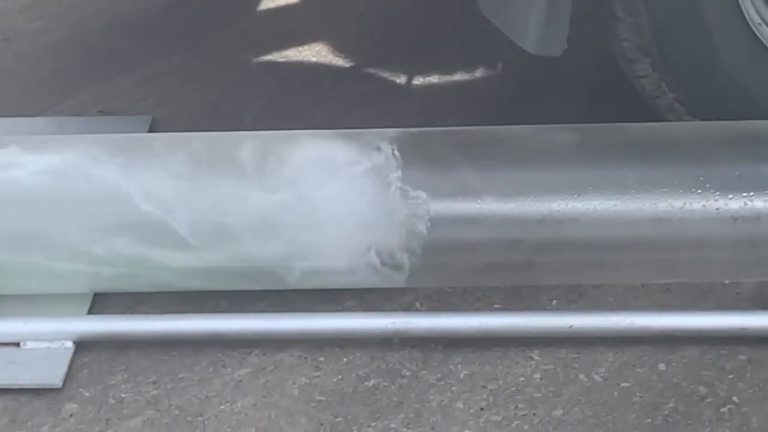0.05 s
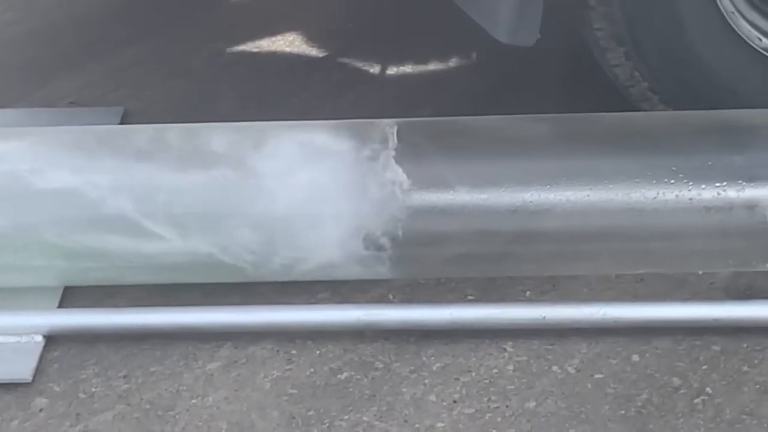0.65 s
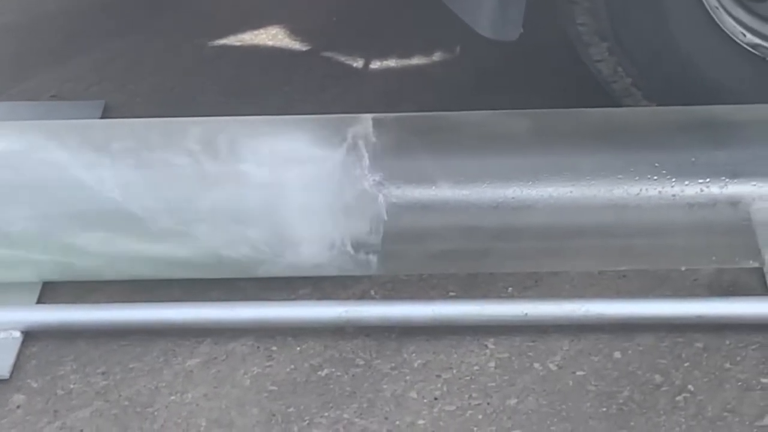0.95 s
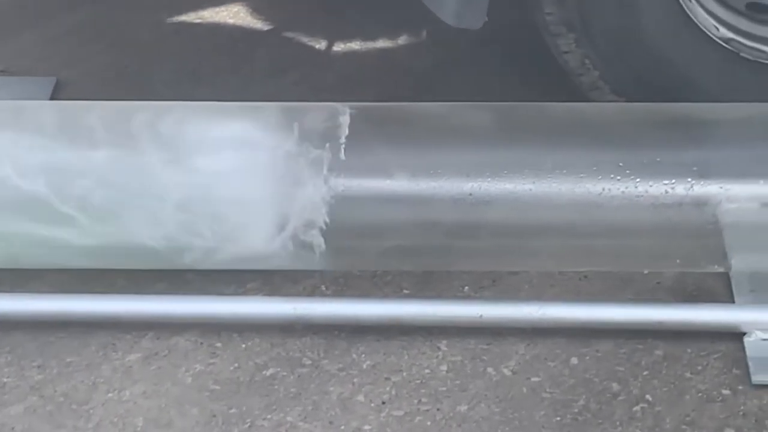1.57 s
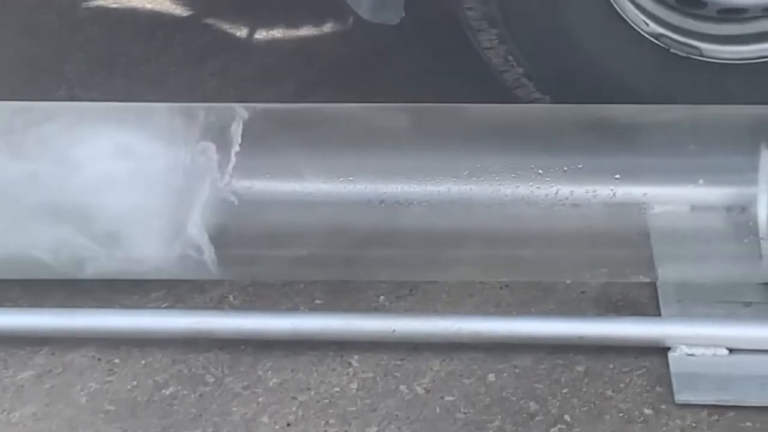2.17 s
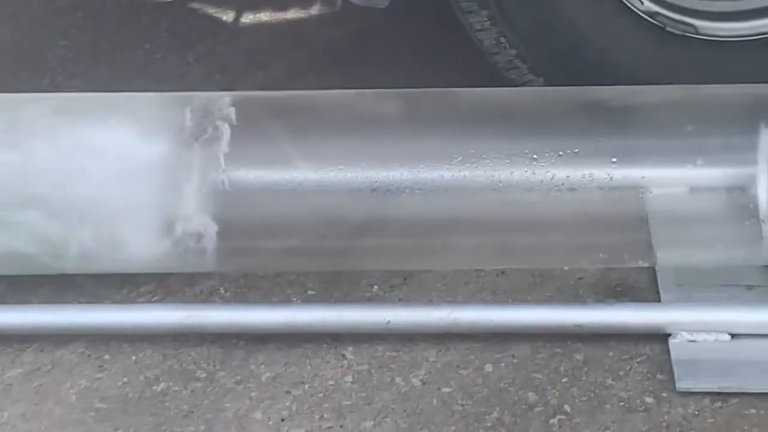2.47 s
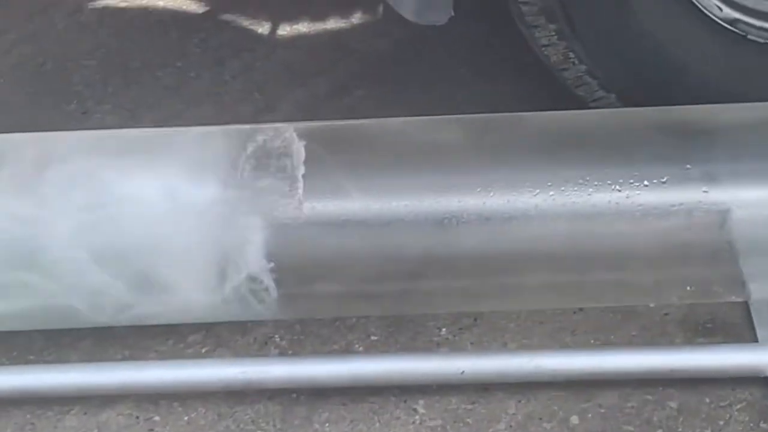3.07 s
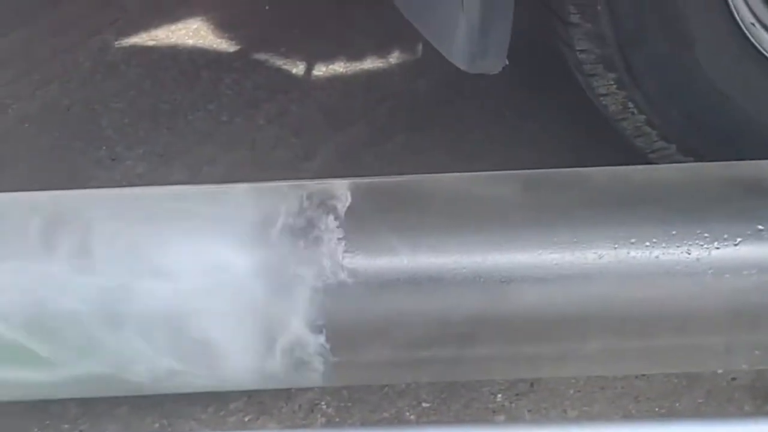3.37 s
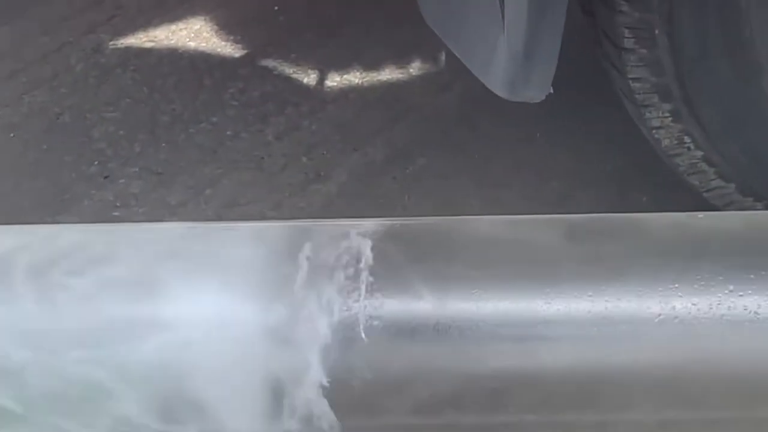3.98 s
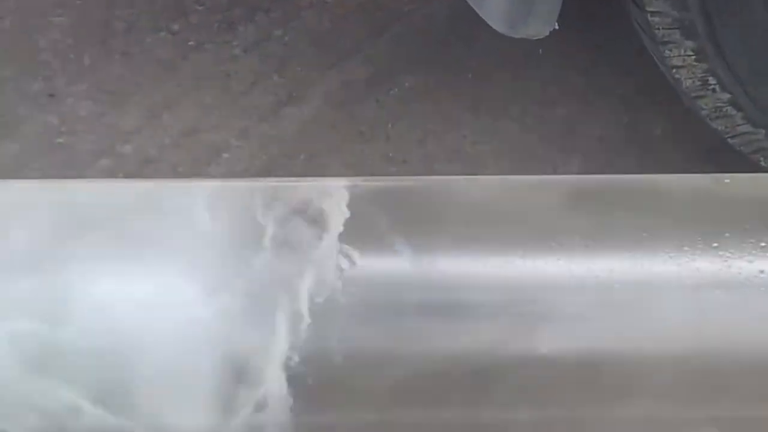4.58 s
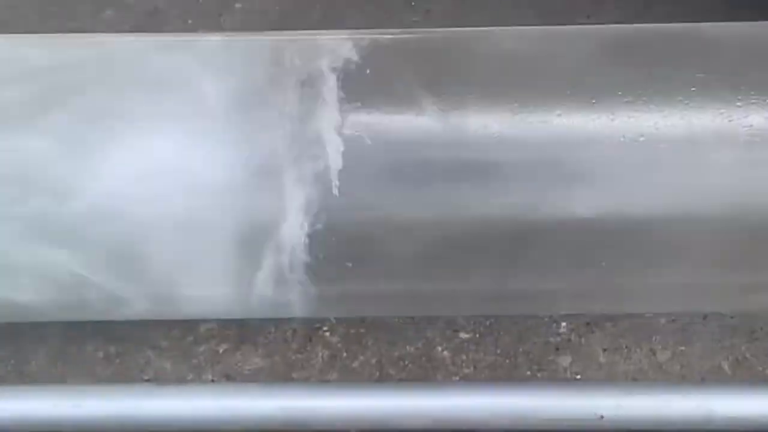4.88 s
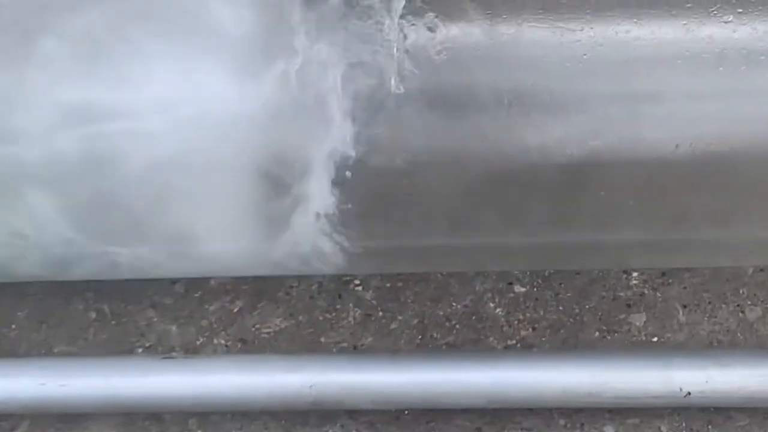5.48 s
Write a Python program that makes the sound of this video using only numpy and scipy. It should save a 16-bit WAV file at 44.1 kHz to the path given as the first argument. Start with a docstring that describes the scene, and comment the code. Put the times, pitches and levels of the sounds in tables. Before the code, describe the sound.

A jet of water churns inside a plastic tube with a continuous rushing hiss. Over it, the impeller driving the jet spins up in a whistling whine that climbs about an octave, quickly at first and then more slowly, fluttering as its overtones swell and dip. The rush eases slightly past the middle. A nearby engine hums low and steady underneath. It is heard outdoors, close up, in stereo on a handheld phone.

```python
"""Water jet into a plastic tube

Outdoors, in stereo on a handheld phone. A ten-bladed impeller spins up and drives a jet into a
clear plastic tube: its blade tones rise as a whistle over a chord of shaft orders, while the
water churns and hisses in the tube. Nearby an engine hums at a steady speed."""
import sys
import numpy as np
from scipy import signal
from scipy.fft import rfft, irfft
from scipy.io import wavfile
from scipy.ndimage import uniform_filter1d

SR = 44100
rng = np.random.default_rng(int(sys.argv[2]) if len(sys.argv) > 2 else 0)


def file_out(sig):
    """Save sig as 16-bit WAV at sys.argv[1]."""
    # one column per channel
    cols = np.atleast_2d(sig).T
    # limit, then scale
    lim = np.clip(cols, -1, 1)
    pcm = np.round(lim * 32767).astype(np.int16)
    wavfile.write(sys.argv[1], SR, pcm)


N = 253134
BLADES, REFERENCE_SHAFT_HZ = 10, 310
FADE_RATE_HZ, FADE_DEPTH = 45, .21  # foam fades the blade tones in and out
HOLLOW_HZ, TOP_HZ = 836, 15650  # centre of the dip in the rush; the phone's upper limit

# impeller speed, levelling off as it spins up: (time [s], shaft rate [Hz])
SHAFT_SPEED = [(0.0, 176.2), (0.3, 200.7), (0.6, 223.2), (0.95, 245.6), (1.3, 266.4), (1.65, 283.8),
               (2.1, 303.8), (2.5, 319.2), (2.9, 331.7), (3.35, 343.0), (3.9, 354.0), (4.5, 363.7),
               (5.1, 372.7), (5.74, 381.5)]
# blade tone and overtones: (multiple of the blade rate, level off resonance [dB])
BLADE_HARMONICS = [(1, -34.5), (2, -19.8), (3, -32), (4, -36), (5, -38), (6, -41), (7, -42), (8, -47)]
# peaks and nodes in the tube, for each main order: (shaft order, frequency [Hz], width [Hz], gain [dB])
TUBE_STANDING_WAVES = [(2, 514, 17, 7), (2, 599, 17, -16), (3, 614, 33, -17), (3, 664, 17, -19),
                       (3, 729, 24, 4), (3, 988, 10, 6), (3, 1068, 50, -15), (3, 1115, 16, -5),
                       (4, 1041, 28, -20), (4, 1154, 18, -15), (4, 1355, 140, -20), (4, 1430, 240, 10),
                       (5, 1040, 60, -8), (5, 1205, 25, 5), (5, 1252, 35, -13), (5, 1310, 50, 5),
                       (5, 1403, 146, -9), (5, 1898, 223, -14), (6, 1200, 45, 11), (6, 1725, 43, 10),
                       (6, 1870, 15, 8), (6, 2130, 120, -5), (6, 2224, 92, -8), (6, 2262, 57, 16),
                       (7, 1399, 165, -4), (7, 1908, 40, 4), (7, 1992, 204, 6), (7, 2118, 24, -12),
                       (7, 2314, 40, 8), (7, 2460, 36, 7), (7, 2520, 70, 4), (7, 2580, 118, -7),
                       (9, 2690, 90, 6), (9, 3130, 484, -6), (9, 3407, 43, -9), (10, 1806, 24, -13),
                       (10, 1917, 149, 16), (10, 2000, 35, 9), (10, 2115, 49, -20), (10, 2157, 69, 11),
                       (10, 2200, 14, -8), (10, 2250, 28, -6), (10, 2290, 18, -7), (10, 2335, 20, 5),
                       (10, 2403, 52, -20), (10, 2439, 119, 11), (10, 2490, 24, 3), (10, 2535, 18, -6),
                       (10, 2596, 30, 6), (10, 2631, 31, -7), (10, 2670, 18, -6), (10, 2723, 16, 7),
                       (10, 2742, 8, -13), (10, 2783, 64, 8), (10, 2804, 10, -20), (10, 2843, 19, -13),
                       (10, 2854, 40, 11), (10, 2986, 30, -14), (10, 3044, 11, 5), (10, 3149, 96, 12),
                       (10, 3162, 27, -13), (10, 3212, 11, -5), (10, 3246, 8, -12), (10, 3280, 10, -6),
                       (10, 3310, 24, -20), (10, 3336, 322, 16), (10, 3355, 16, -7), (10, 3397, 17, -12),
                       (10, 3445, 18, 4), (10, 3493, 15, -15), (10, 3532, 16, -14), (10, 3564, 10, 4),
                       (10, 3598, 14, -10), (10, 3615, 7, -9), (10, 3624, 12, 16), (10, 3629, 24, -12),
                       (10, 3677, 20, 10), (10, 3691, 10, -16), (10, 3711, 7, 7), (10, 3720, 6, -14),
                       (10, 3741, 7, 7), (10, 3772, 52, 16), (10, 3783, 14, -15), (11, 3241, 186, 10),
                       (11, 3878, 54, -10), (11, 4123, 44, 9), (13, 3954, 49, 9), (13, 4370, 505, -9),
                       (14, 3930, 54, 8), (14, 4616, 52, -15), (14, 4995, 136, 9), (15, 4528, 113, 9),
                       (15, 5327, 44, -20), (16, 4531, 116, 10), (16, 5049, 24, 9), (16, 5523, 70, -12),
                       (17, 5022, 83, 12), (17, 6160, 124, -11), (17, 6384, 31, 7), (19, 4554, 1112, 9),
                       (19, 6925, 101, 8), (20, 3592, 144, -20), (20, 3775, 65, -16), (20, 4071, 120, 6),
                       (20, 4240, 131, -20), (20, 4379, 48, -13), (20, 4628, 127, -10), (20, 4771, 32, -10),
                       (20, 4880, 50, 3), (20, 4970, 60, -20), (20, 5000, 42, 12), (20, 5096, 60, -20),
                       (20, 5255, 49, -14), (20, 5411, 54, -14), (20, 5515, 178, 10), (20, 5699, 355, -20),
                       (20, 5717, 19, 12), (20, 6018, 173, 6), (20, 6075, 20, -6), (20, 6158, 43, -19),
                       (20, 6274, 24, -16), (20, 6477, 313, -10), (20, 6638, 11, -13), (20, 6906, 10, -14),
                       (20, 6932, 34, 10), (20, 6960, 14, -6), (20, 7002, 15, 7), (20, 7168, 96, 15),
                       (20, 7175, 51, -20), (20, 7279, 63, -8), (20, 7374, 1200, -9), (20, 7404, 14, -14),
                       (20, 7465, 10, -9), (20, 7509, 46, 8), (30, 6211, 252, 7), (30, 8123, 131, 5),
                       (30, 8688, 210, 6), (30, 9599, 63, 11), (30, 9890, 346, -12), (30, 10107, 370, 14),
                       (30, 10935, 1657, -9), (30, 11073, 381, 12), (40, 8680, 265, 13),
                       (40, 11915, 191, 5), (40, 14279, 321, -6)]
# other multiples of the shaft rate: (shaft order, level off resonance at the reference speed [dB])
SHAFT_HARMONICS = [(1, -56), (2, -50.0), (3, -40.5), (4, -45.5), (5, -41.5), (6, -48.5), (7, -46.5),
                   (8, -47.0), (9, -41.0), (11, -41.0), (12, -42.0), (13, -38.0), (14, -41.5), (15, -40.5),
                   (16, -39.0), (17, -40.5), (18, -42.0), (19, -44.0), (21, -43.0), (22, -45.5),
                   (23, -44.5), (24, -45.5), (25, -46.0), (26, -42.0), (27, -48.0), (28, -49.5),
                   (29, -49.5), (31, -53.5), (32, -53.0), (33, -55.0), (34, -52.5), (35, -54.0),
                   (36, -47.0), (37, -54.0), (38, -56.0), (39, -53.0), (41, -58.0), (42, -55.5),
                   (46, -51.0)]
# housing resonances that lift a passing shaft tone: (frequency [Hz], width [Hz], gain [dB])
HOUSING_MODES = [(219, 60, 11), (254, 26, 13), (305, 50, 11), (377, 14, 3), (648, 110, 11), (763, 31, 7.5),
                 (1320, 113, 9.5), (1897, 207, 10.5)]
# strength of the flow: (time [s], level [dB])
FLOW_LEVEL = [(0, 5.5), (.5, 2), (2.15, 2), (3.0, -1.4), (3.7, -3.5), (4.3, -2.5), (5.74, -1.3)]
# rushing water at a flow level of 0 dB: (frequency [Hz], noise density [dB re 1/Hz])
WATER_SPECTRUM = [(25, -90), (60, -71.5), (150, -73.5), (400, -70), (680, -70.5), (930, -75), (1300, -75),
                  (2400, -75.5), (3300, -72), (4500, -72), (6500, -70.5), (9000, -74), (11000, -77),
                  (13000, -78.5), (15000, -87)]
# how closely the rush follows the flow: (frequency [Hz], slope [dB per dB])
FLOW_SENSITIVITY = [(344, 1.0), (1380, 1), (6900, 1.2)]
# one band of the rush hollows out as the phone moves in: (time [s], gain at the dip's centre [dB])
HOLLOW_GAIN = [(0, -0.5), (2.8, 1), (3.7, -10), (5.1, -36), (5.74, -15)]
# hollow resonances of the tube: (frequency [Hz], width [Hz], level at a flow of 0 dB [dB])
TUBE_MODES = [(213.7, 44, -45.5), (297.5, 25.3, -45), (523.2, 20.4, -48.5)]
# engine lines, drifting in level as the phone moves: (frequency [Hz], start level [dB], end level [dB])
ENGINE_LINES = [(56, -59, -62), (69.3, -41.5, -49), (166.6, -42, -64.5), (174.8, -56, -68.5),
                (241.7, -45, -66.5), (396, -54, -72), (411, -80, -55)]
# water noise coming back from all around: (frequency [Hz], gain on the water spectrum [dB])
SCATTER = [(40, -13), (70, -10), (110, -16), (500, -3.5), (1300, -2.5), (2400, -1.0), (3600, -45),
           (12000, -64)]
# stereo phase by frequency: (frequency [Hz], lead of left over right [rad])
STEREO_PHASE = [(0, 0), (1300, -.6), (1800, .3), (2150, .7), (2450, 2.3), (3100, 1.05), (3900, 2.05),
                (4300, 2.8), (4950, 3.45), (6400, 6.1), (7200, 6.45), (8400, 9.2), (9400, 9.6),
                (10700, 12.4), (11500, 12.75), (12700, 15.5), (13700, 15.9), (15000, 18.7)]
# stereo balance by frequency: (frequency [Hz], left minus right [dB])
STEREO_BALANCE = [(200, 0), (500, -.5), (1400, 0), (2100, -4), (2700, -1), (3600, 0)]


def undb(db):
    """Decibels to gain."""
    return 10 ** (np.asarray(db) / 20)


def curve(table):
    """Join (time, value) points by straight lines at every sample."""
    return np.interp(np.arange(N) / SR, *np.transpose(table))


def colour(table, hz):
    """Read (frequency, value) points on a log-frequency axis."""
    points_hz, values = np.transpose(table)
    return np.interp(np.log(np.maximum(hz, 1)), np.log(points_hz), values)


def walk(rate_hz):
    """Random levels held for 1 / rate_hz seconds and smoothed twice; spread 1."""
    hold = max(int(SR / rate_hz), 2)
    held = np.repeat(rng.standard_normal(N // hold + 2), hold)[rng.integers(hold):]
    return uniform_filter1d(uniform_filter1d(held, hold), hold)[:N] / np.sqrt(.55)


def tone(phase, rough, size_noise, phase_noise):
    """A sine of rms 1 whose size and phase waver; rough is the wavering part against the steady one."""
    phase = phase + rng.uniform(0, 2 * np.pi)
    wave = (1 + rough * size_noise) * np.sin(phase) + rough * phase_noise * np.cos(phase)
    return wave * np.sqrt(2 / (1 + 2 * rough ** 2))


def resonance(hz, width_hz):
    """Noise ringing in one resonance with steep skirts; rms 1."""
    b, a = signal.iirpeak(hz, hz / (1.5 * width_hz), fs=SR)
    ring = signal.lfilter(b, a, signal.lfilter(b, a, rng.standard_normal(N)))
    return ring / ring.std()


def lift_db(resonances, hz):
    """Gain of a tone at hz from a table of bell-shaped peaks and dips."""
    return sum(db / (1 + (2 * (hz - centre) / width) ** 2) for centre, width, db in resonances)


def standing_db(order, shaft_hz):
    """Standing waves in the tube: a rising order swells at a resonance and drops out at a node."""
    waves = [wave[1:] for wave in TUBE_STANDING_WAVES if wave[0] == order]
    return lift_db(waves, order * shaft_hz)


def foam_fading(depth):
    """Gain of a steady path plus one scattered by foam: round swells and short dips; rms 1."""
    scattered = (walk(FADE_RATE_HZ) + 1j * walk(FADE_RATE_HZ)) / np.sqrt(2)
    return np.abs(1 + depth * scattered) / np.sqrt(1 + depth ** 2)


def turbulence(corner_hz):
    """Random flutter, mostly slower than the corner but with a fast tail; spread 1."""
    flutter = rng.standard_normal(N)
    for hz in (corner_hz, 10 * corner_hz):
        flutter = signal.lfilter([1], [1, -np.exp(-2 * np.pi * hz / SR)], flutter)
    return flutter / flutter.std()


def blade_tones(shaft_hz, shaft_angle):
    """Blades chop the flow into a rising whistle, faded by foam and roughened by turbulence."""
    out = 0
    for harmonic, db in BLADE_HARMONICS:
        order = harmonic * BLADES
        audible = order * shaft_hz < TOP_HZ + 1000
        # higher overtones fade more deeply, are rougher and flicker more
        fade = foam_fading(FADE_DEPTH * harmonic ** .6)
        rough = .09 * harmonic ** 1.4
        flicker_db = (.9 + .2 * harmonic) * walk(70)
        sine = tone(order * shaft_angle, rough, turbulence(corner_hz=26.4), turbulence(corner_hz=22.2))
        out += audible * undb(db + standing_db(order, shaft_hz) + flicker_db) * fade * sine
    return out


def shaft_tones(shaft_hz, shaft_angle):
    """No two blades are alike, so other shaft orders sound too, sweeping through housing and tube."""
    speed = shaft_hz / REFERENCE_SHAFT_HZ
    speed_db = 19 * np.log10(speed)
    out = 0
    for order, db in SHAFT_HARMONICS:
        # short waves fade faster and more deeply than long ones, most of all early in the spin-up
        fade_hz = 16 + 1.1 * order
        depth = min(.09 * order, .85) / speed
        sine = tone(order * shaft_angle, depth, walk(fade_hz), walk(fade_hz))
        growth_db = min(order / BLADES, 1) * speed_db
        resonance_db = lift_db(HOUSING_MODES, order * shaft_hz) + standing_db(order, shaft_hz)
        out += undb(db + growth_db + resonance_db) * sine
    return out


def water(flow_db, swell_db, flicker_db):
    """Water rushes in the tube: third-octave bands of noise that surge together and flicker alone."""
    hz = np.fft.rfftfreq(N, 1 / SR)
    spectrum = rfft(rng.standard_normal(N)) * undb(colour(WATER_SPECTRUM, hz)) * np.sqrt(SR / 2)
    edges_hz = 20 * 2 ** (np.arange(31) / 3)
    surge_db = swell_db * walk(12)
    hollow_db = curve(HOLLOW_GAIN)
    out = 0
    for low, high in zip(edges_hz, edges_hz[1:]):
        centre_hz = np.sqrt(low * high)
        band = irfft(spectrum * ((hz >= low) & (hz < high)), N)
        follow_db = colour(FLOW_SENSITIVITY, centre_hz) * flow_db
        dip_db = hollow_db * np.exp(-(np.log(centre_hz / HOLLOW_HZ) / 0.12) ** 2)
        out += band * undb(follow_db + dip_db + surge_db + flicker_db * walk(40))
    return out


def tube(flow_db):
    """The foaming front rings the hollow tube; the lowest resonances follow the churning most."""
    return sum(undb(db + min(230 / hz, 1) * flow_db) * resonance(hz, width_hz)
               for hz, width_hz, db in TUBE_MODES)


def engine(flow_db):
    """An engine nearby: steady lines over an exhaust drone that rises and falls with the rush."""
    radians_per_hz = 2 * np.pi * np.arange(N) / SR
    out = undb(-48.0 + 0.6 * flow_db) * resonance(hz=103.0, width_hz=16.6)
    for hz, start_db, end_db in ENGINE_LINES:
        line = tone(hz * radians_per_hz, rough=hz / 1200, size_noise=walk(3.64), phase_noise=walk(2.6))
        out += undb(np.linspace(start_db, end_db, N)) * line
    return out


def surroundings(flow_db):
    """Water noise thrown back from all around, dulled and unrelated between left and right."""
    hz = np.fft.rfftfreq(N, 1 / SR)
    gain = undb(colour(WATER_SPECTRUM, hz) + colour(SCATTER, hz))
    noise = irfft(rfft(rng.standard_normal((2, N))) * gain, N)
    return noise * np.sqrt(SR / 2) * undb(flow_db)


def stereo_image(direct):
    """Treble reaches the left ear slightly before the right; the right hears more upper middle."""
    hz = np.fft.rfftfreq(N, 1 / SR)
    lead = np.interp(hz, *np.transpose(STEREO_PHASE))
    half_db = colour(STEREO_BALANCE, hz) / 2
    left, right = undb(half_db), undb(-half_db) * np.exp(-1j * lead)
    return irfft(rfft(direct) * np.array([left, right]), N)


def scene():
    """Impeller, water, tube and engine in stereo, from where the phone is held."""
    shaft_hz = curve(SHAFT_SPEED) * (1 + 0.00018 * walk(20))  # the uneven load shakes the speed a little
    shaft_angle = 2 * np.pi * np.cumsum(shaft_hz) / SR
    flow_db = curve(FLOW_LEVEL)
    impeller = blade_tones(shaft_hz, shaft_angle) + shaft_tones(shaft_hz, shaft_angle)
    rush = water(flow_db, swell_db=.2, flicker_db=.5)
    direct = impeller + rush + tube(flow_db) + engine(flow_db)
    return stereo_image(direct) + surroundings(flow_db)


def record(dry):
    """The phone cuts the top of the treble steeply."""
    return signal.sosfilt(signal.ellip(10, .1, 80, TOP_HZ, fs=SR, output="sos"), dry)


dry = scene()
out = record(dry)
file_out(out)
```